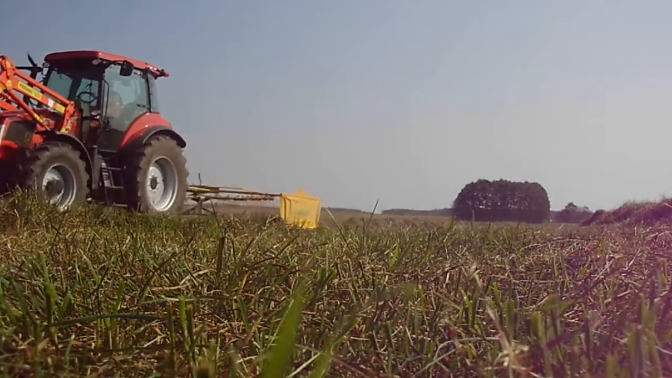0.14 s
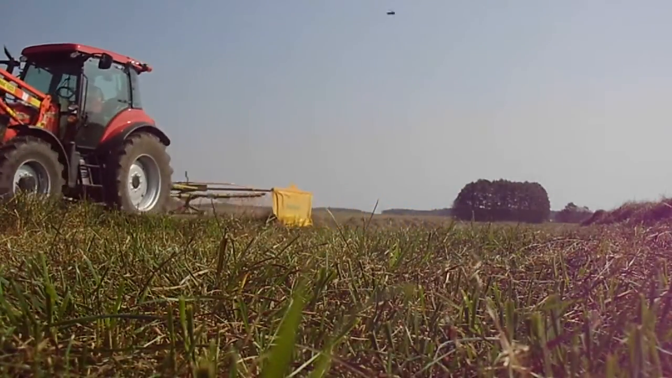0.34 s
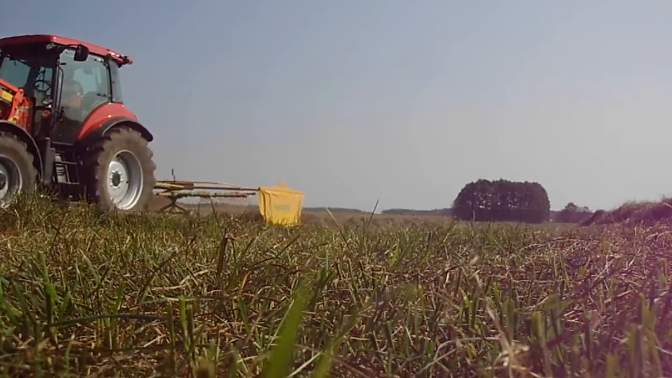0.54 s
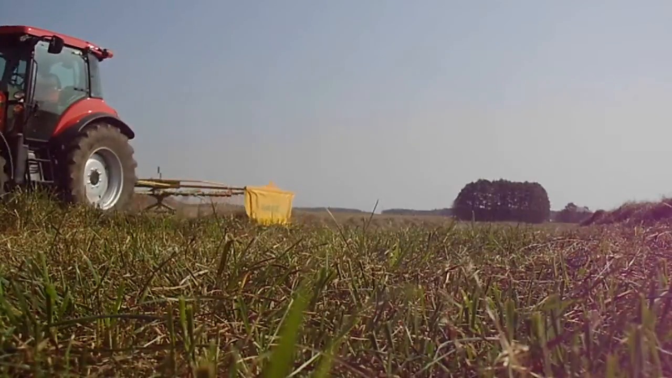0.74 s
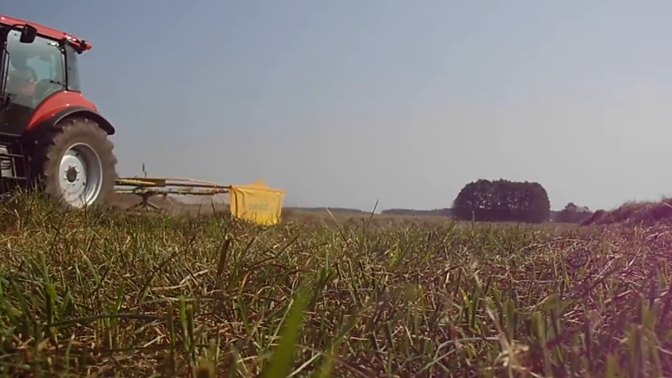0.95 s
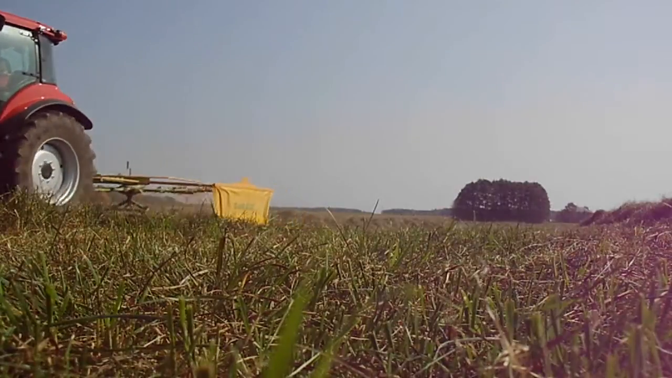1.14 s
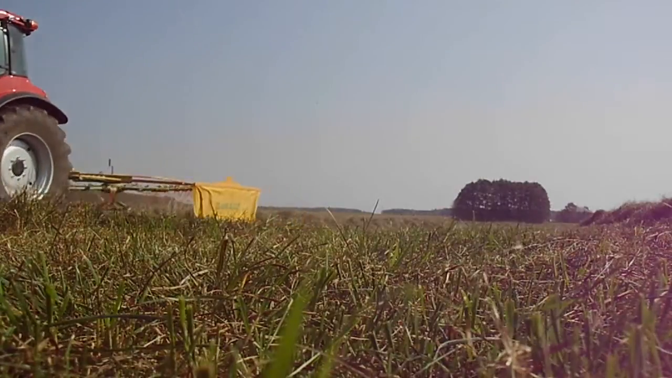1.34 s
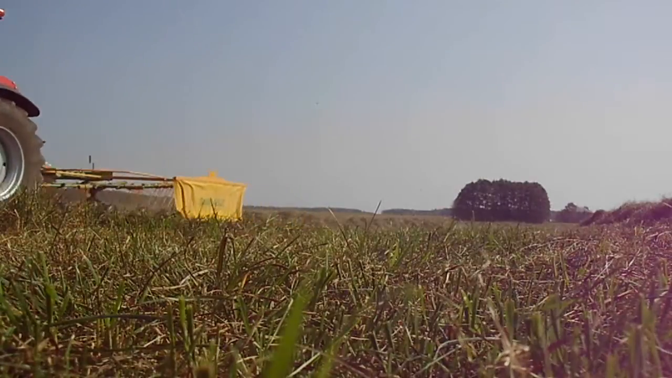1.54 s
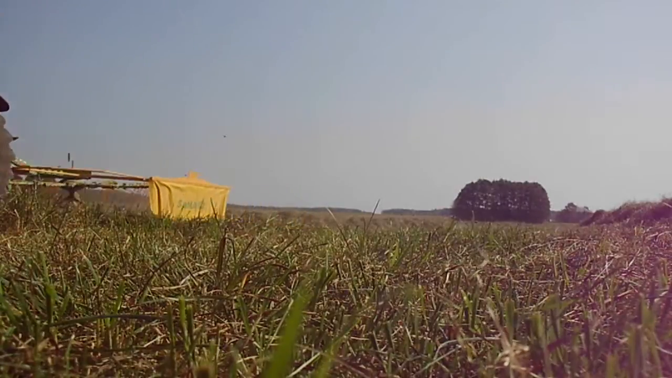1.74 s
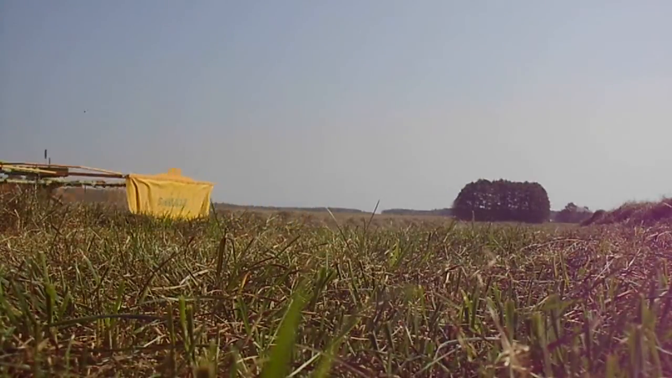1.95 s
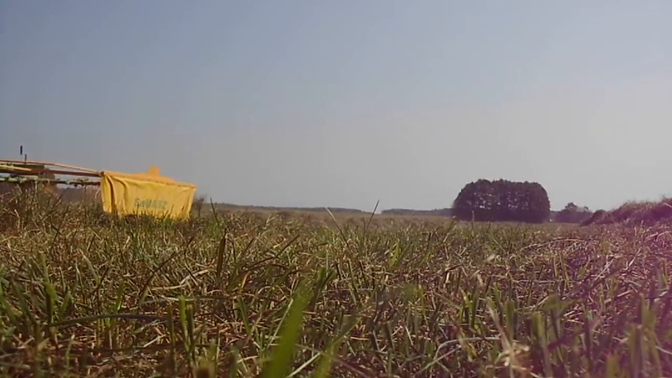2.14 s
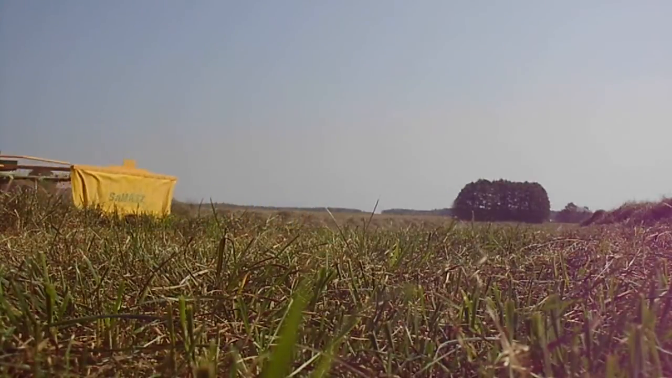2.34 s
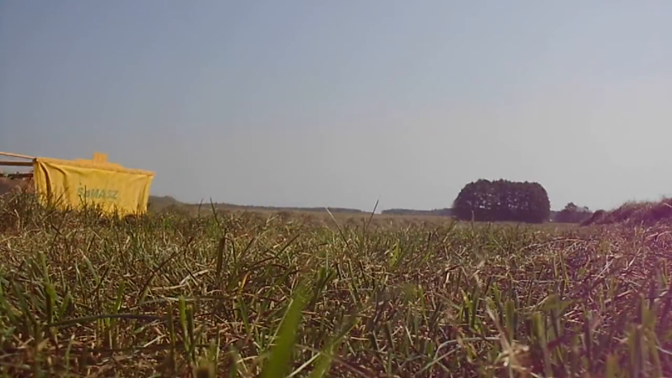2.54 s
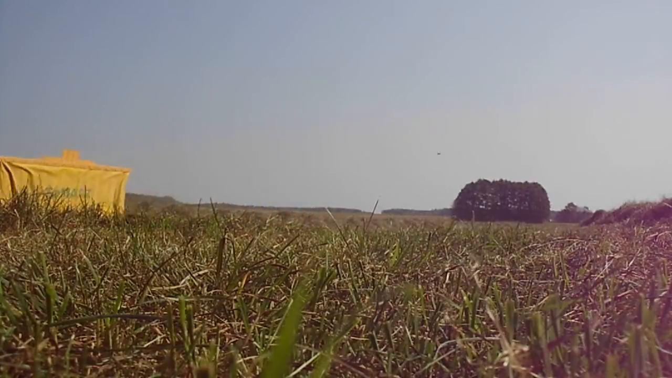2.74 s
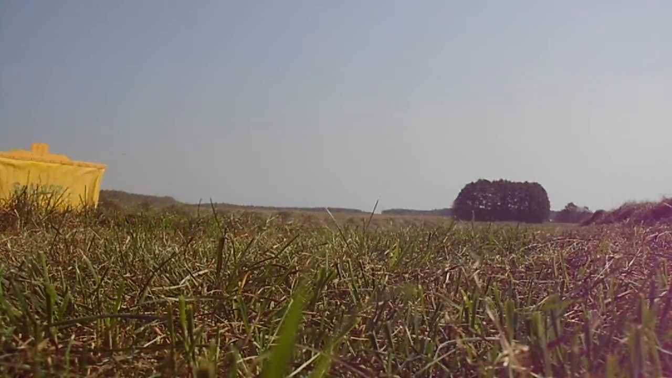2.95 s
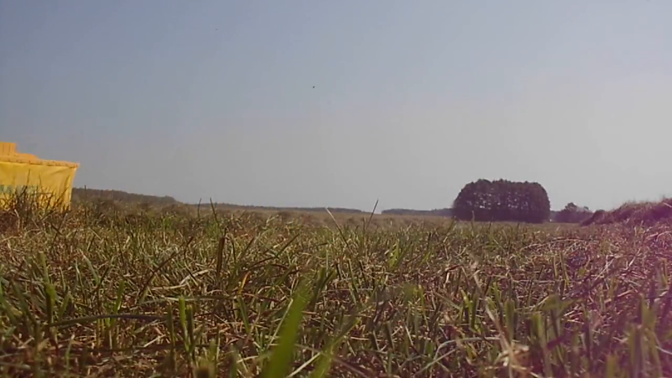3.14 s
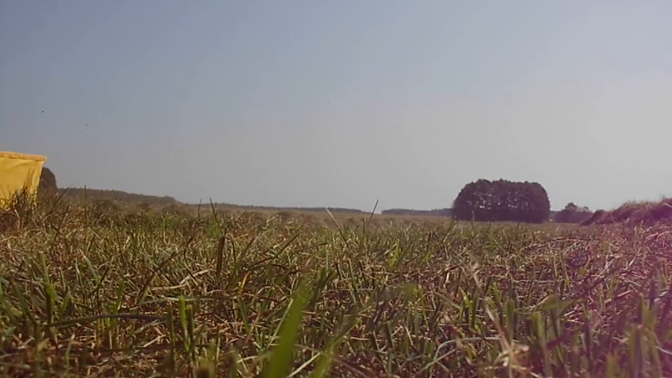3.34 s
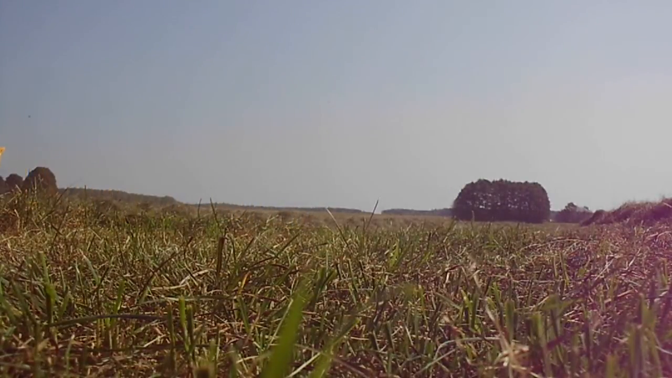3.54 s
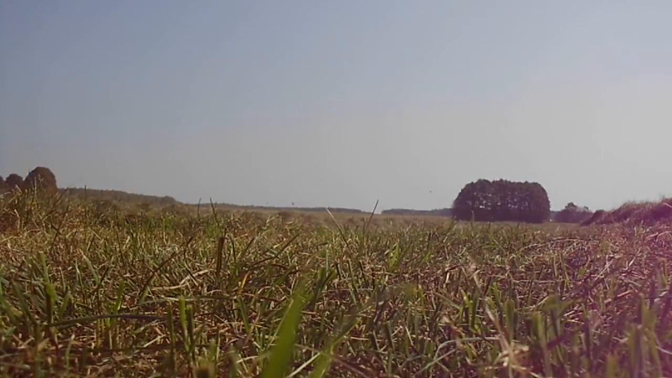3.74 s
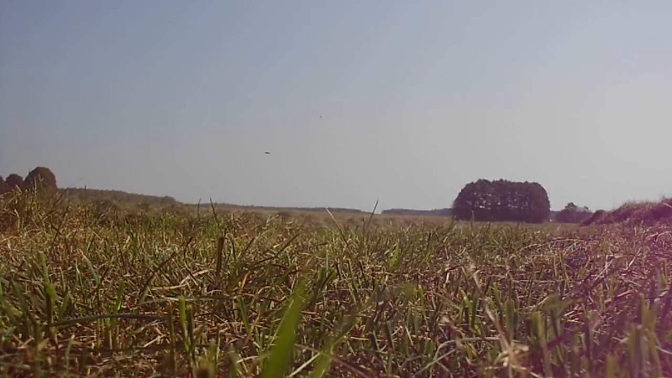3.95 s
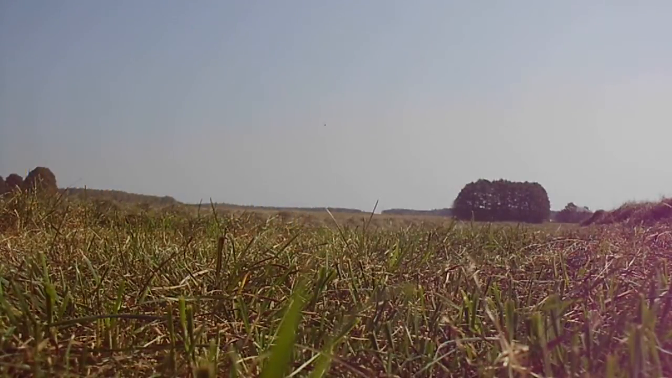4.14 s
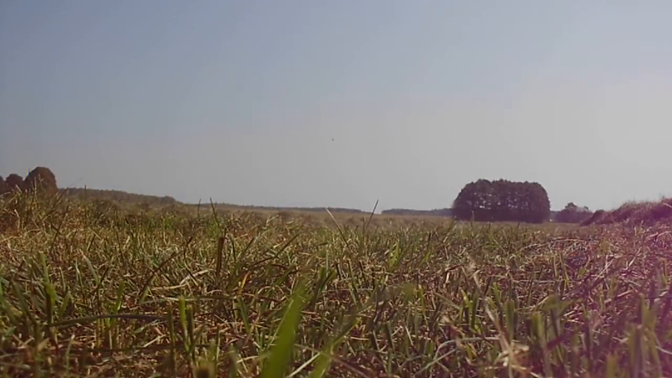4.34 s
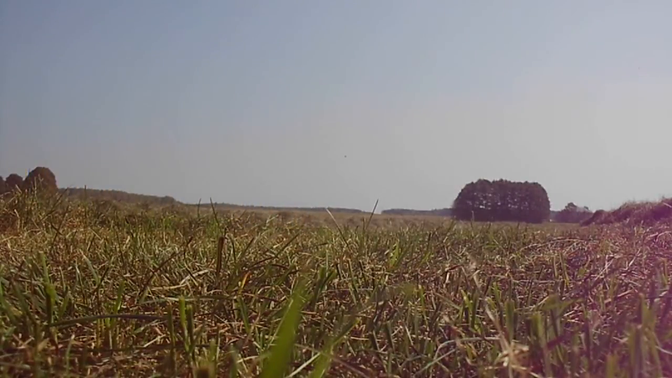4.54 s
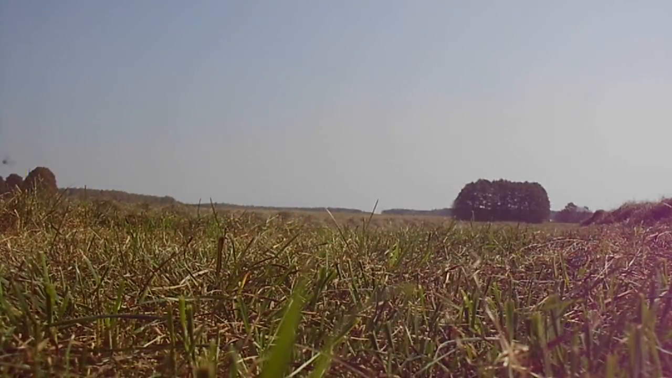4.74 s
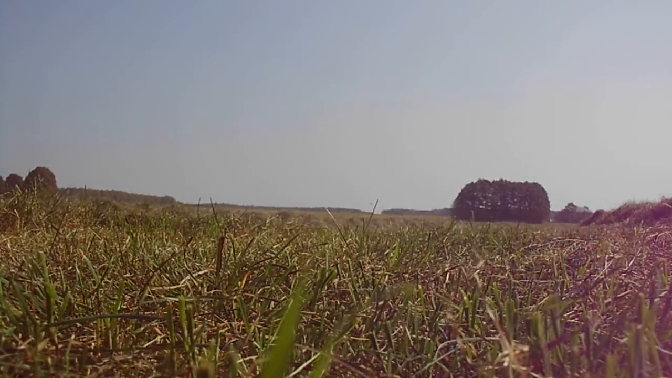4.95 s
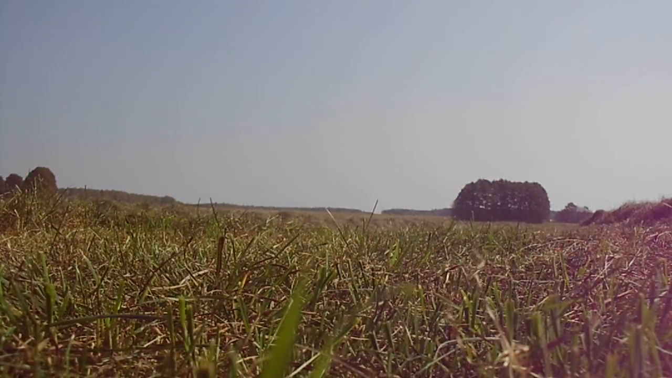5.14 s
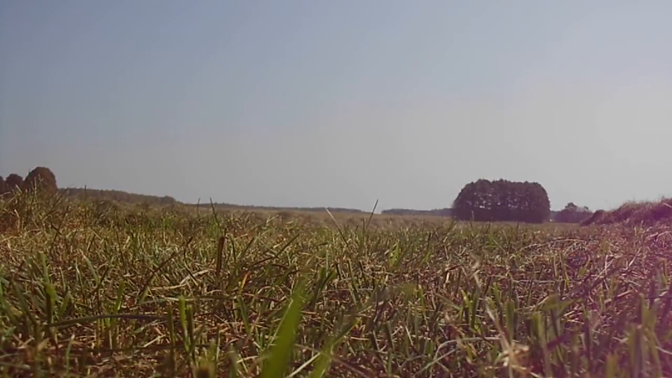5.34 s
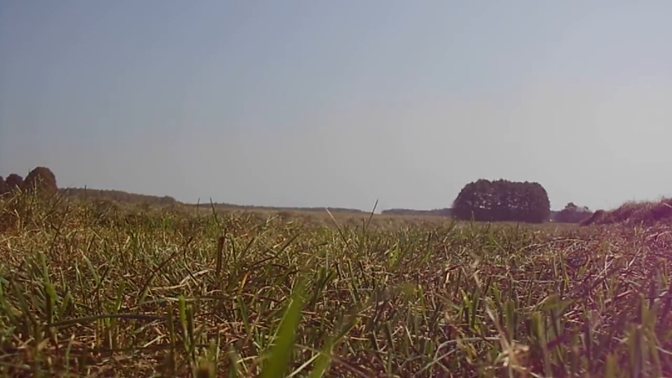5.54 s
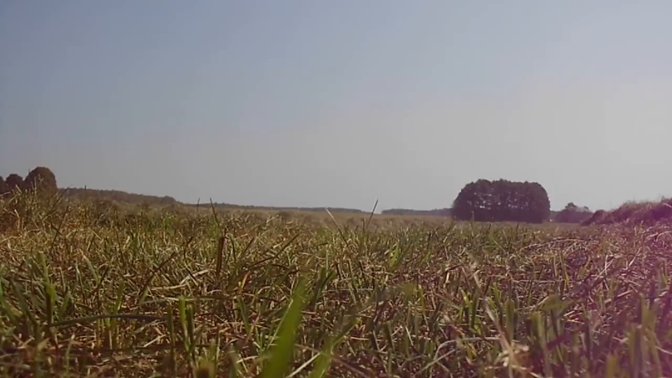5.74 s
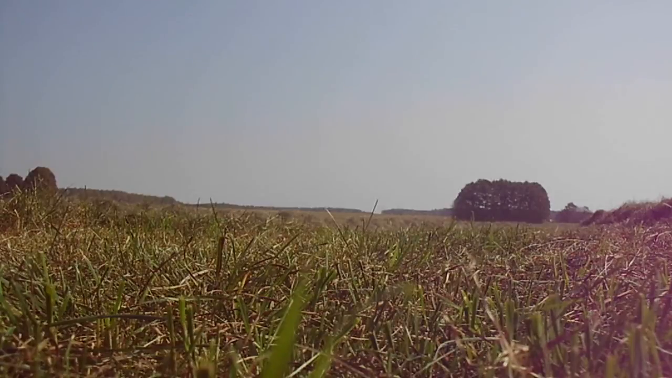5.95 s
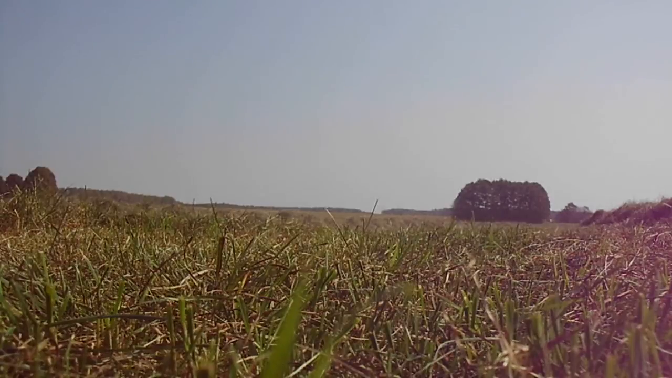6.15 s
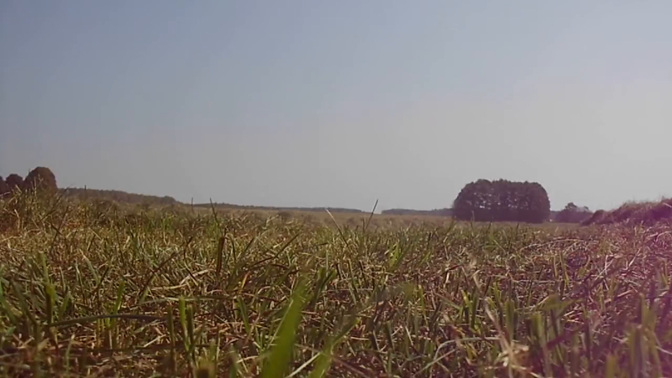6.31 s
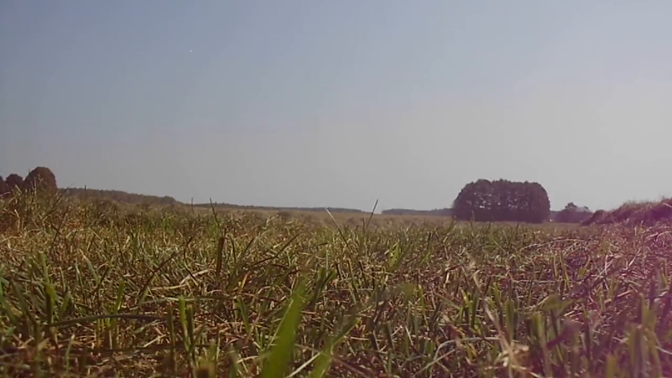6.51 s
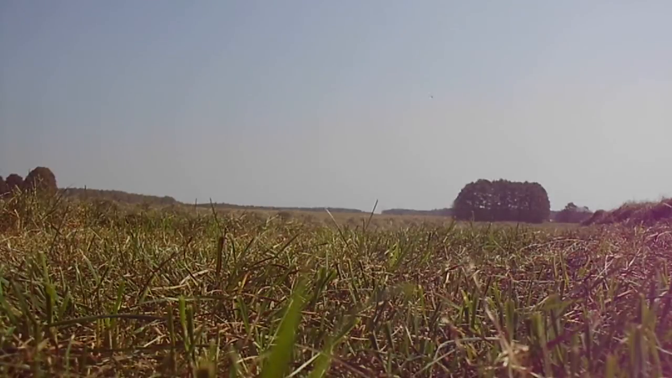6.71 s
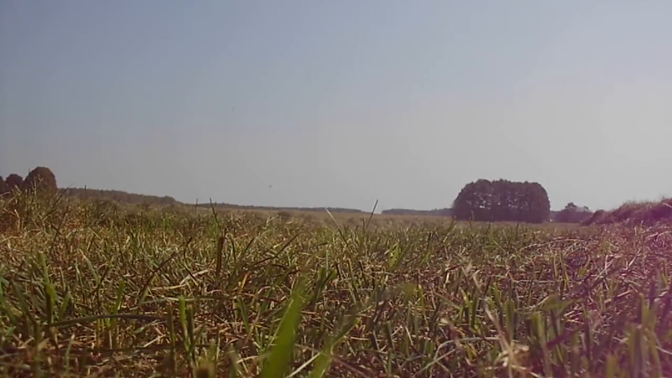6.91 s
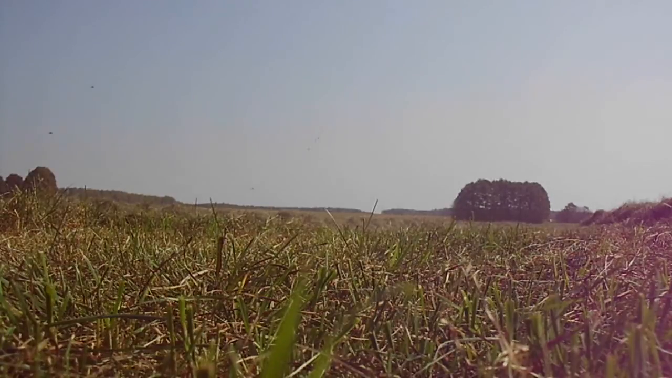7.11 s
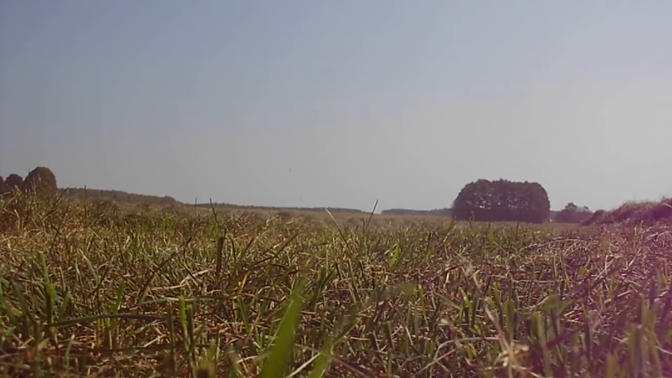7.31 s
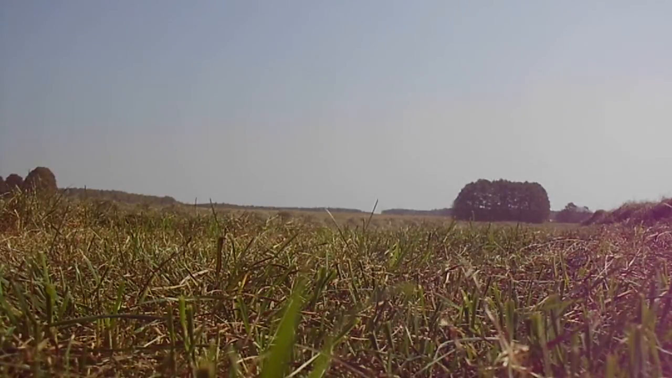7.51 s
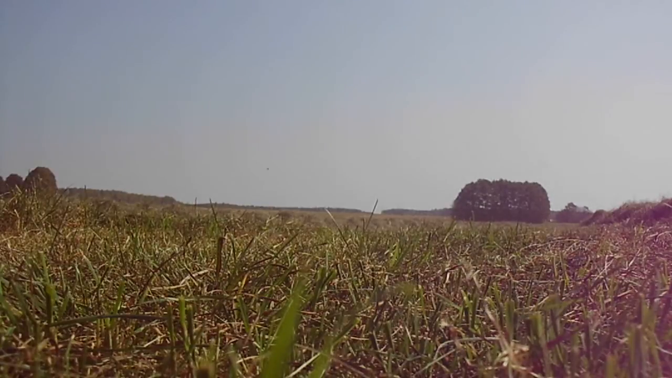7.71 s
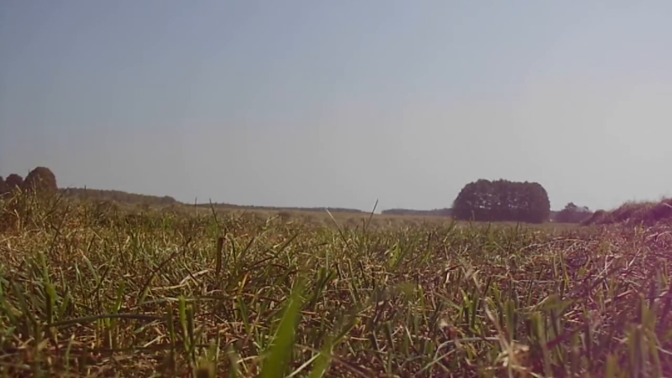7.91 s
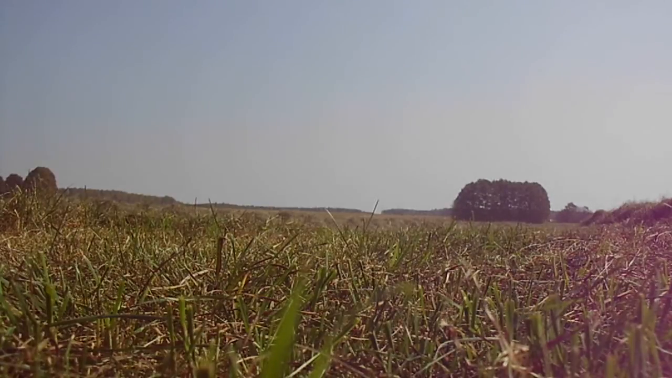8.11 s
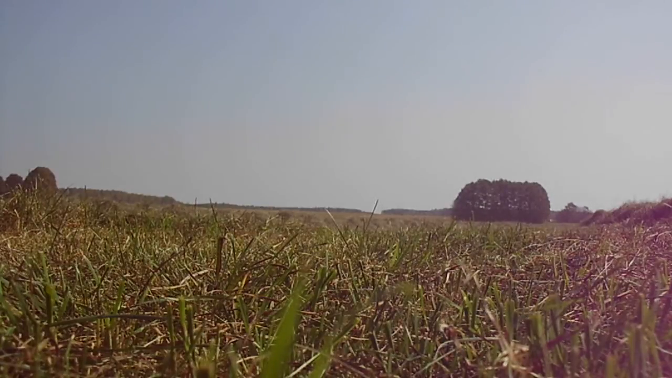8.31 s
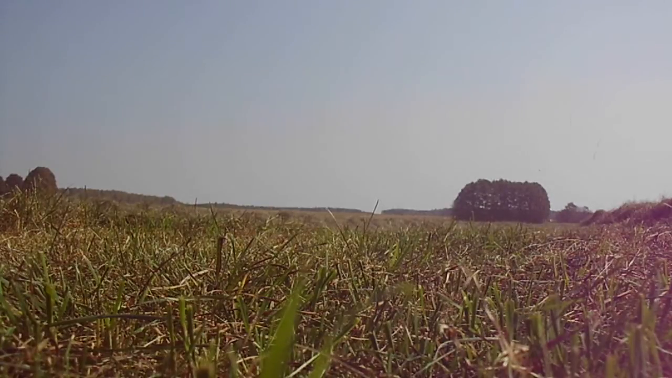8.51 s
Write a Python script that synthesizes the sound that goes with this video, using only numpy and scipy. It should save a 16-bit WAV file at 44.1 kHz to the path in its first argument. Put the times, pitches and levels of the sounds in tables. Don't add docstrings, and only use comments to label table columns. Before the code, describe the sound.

A steady, heavy diesel drone swells slightly as the tractor comes abreast, with rough exhaust rumble, pulsing clatter and swishing hay. Intermittent high whines come from the rake gears. As the tractor leaves, metal tines rattle and a dry joint chirps in quick bursts, before the engine gradually drops in level. Close, outdoor, low-placed small camera microphone with limited treble, flattened peaks and only a faint late echo.

```python
import sys
import numpy as np
from scipy import signal
from scipy.fft import rfft, irfft
from scipy.io import wavfile
from scipy.ndimage import uniform_filter1d

SR = 44100
rng = np.random.default_rng(int(sys.argv[2]) if len(sys.argv) > 2 else 0)


def pcm_store(signal):
    levels = np.round(np.clip(np.atleast_2d(signal), -1, 1) * 32767)
    wavfile.write(sys.argv[1], SR, levels.astype(np.int16).T)


def gain_from_db(level_db):
    decades = np.asarray(level_db, float) / 20
    return 10 ** decades


N = 382347
T = np.arange(N) / SR
ABREAST_S = 3.0

# closest_db [dB], share of the distance loss [ratio], turning [dB/s]
PARTS = [
    (-14.5, 0.48, 0.14),
    (-15, 1.07, 0.1),
    (-31, 0.89, -0.21),
    (-25.5, 1.125, -0.33),
    (-23.5, 1.01, -1.54),
]


def level(x, db):
    return x * gain_from_db(db) / np.sqrt(np.mean(x ** 2))


def columns(table):
    s, *rest = np.transpose(table)
    return [np.interp(T, s, c) for c in rest]


def walk(rate):
    hold = int(SR / rate)
    steps = np.repeat(rng.standard_normal(N // hold + 1), hold)
    return 1.3 * uniform_filter1d(uniform_filter1d(steps, hold), hold)[:N]


def tone(hz, db, wobble):
    phase = 2 * np.pi * np.cumsum(hz) / SR + wobble * walk(11) + 2 * np.pi * rng.random()
    return np.sqrt(2) * gain_from_db(db + 3.0 * wobble * walk(15)) * np.sin(phase)


def band(x, hz, width_hz):
    edges = np.clip([hz - width_hz / 2, hz + width_hz / 2], [300, 400], [7000, 9000])
    return signal.sosfilt(signal.butter(2, edges, "band", fs=SR, output="sos"), x)


def heard(db, share, turning):
    # time_s [s], gain_db [dB]
    nearness = [(0, -3.5), (.8, -1.87), (1.7, 0.5), (3.0, -0.05), (3.9, .5), (4.5, -.3), (5.2, -3),
                (6.4, -7), (7.6, -11), (8.67, -14.5)]
    return db + share * columns(nearness)[0] + turning * (T - ABREAST_S)


def swells(rows):
    return sum(db * np.exp(-((T - s) / half) ** 2) for s, half, db in rows)


def speed():
    governor = [(0, 53.4), (.5, 52.6), (.8, 52.95), (1.2, 52.1), (1.6, 53.4), (1.83, 52.4), (2.2, 53.75),
                (2.52, 52.2), (2.72, 52.9), (3.02, 52), (3.33, 52.5), (3.7, 52.2), (4, 52.9), (4.25, 52.3),
                (4.6, 53.4), (4.95, 51.9), (5.65, 52.8), (8.67, 52.25)]
    flywheel_s = .14
    return uniform_filter1d(columns(governor)[0], size=int(flywheel_s * SR))


def firing():
    multiples = (1, 2, 3, 5, 7.88)
    # closest_db [dB], share of the distance loss [ratio], turning [dB/s], wander_db [dB]
    orders = [
        (-22, 0.5, -0.05, -0.3),
        (-28, .35, -0.2, 2),
        (-22.5, .9, 0.52, 0.8),
        (-37, 1.5, -1, 2),
        (-27.5, 0.71, -2.5, -1),
    ]
    side_tones = ((1.75, 2.25, 2.5, 3.2, 4, 4.75, 5.5, 7.1, 7.5, 8.64, 12.24, 12.42, 15.76, 17.48, 18.64),
                  (-24, -24, -21, -23, -17, -21, -22, -19, -21, -22, -20, -22, -21, -24, -25))
    # centre_s [s], half_length_s [s], gain_db [dB]
    booms = [
        (.3, 0.74, -8.5),
        (2.8, 0.37, 7.5),
        (4.9, 0.55, 5),
        (8.6, .3, -11.5),
    ]
    # centre_s [s], half_length_s [s], gain_db [dB]
    bonnet_swells = [(.5, .15, 9), (1.2, .25, 13), (3.3, .4, 7)]
    # centre_s [s], half_length_s [s], gain_db [dB]
    pump_swells = [(.2, .7, 4), (1.58, .2, 5.5), (2.2, .12, 3), (3.05, .35, 7.5), (3.75, .15, -5),
                   (4.5, .35, 10), (5.7, .6, 7)]

    hz = speed()
    tones_db = [heard(*row) + wander * walk(2.95) for *row, wander in orders]
    tones_db[2] = tones_db[2] + swells(booms)
    tones_db[3] = tones_db[3] + swells(bonnet_swells)
    tones_db[4] = tones_db[4] + swells(pump_swells)
    casing_db = heard(*PARTS[1])
    lift_db = (0, 1, 1.5, 2.5, 2)
    wobble = (.02, .12, .2, .15, .15)

    tones = np.zeros(N)
    for multiple, db, lift, unsteady in zip(multiples, tones_db, lift_db, wobble):
        tones += tone(multiple * hz, db + lift, unsteady)
    for multiple, db in zip(*side_tones):
        tones += tone(multiple * hz, casing_db + db + 2.5, .25)

    boom_db = uniform_filter1d(np.maximum(tones_db[2], -40), size=SR // 2)
    tones += tone(2.66 * hz, boom_db - 5.5, 0.75)
    tones += tone(2.77 * hz, boom_db - 8, 0.83)
    return tones, np.cumsum(hz) / SR


def roar(turns):
    # pitch_hz [Hz], density_db [dB per Hz]
    machine_colour = [(20, -14.5), (45, -19), (80, -8.5), (145, -3), (200, -4), (400, -4.5), (500, -6),
                      (950, -12.5), (1350, -24), (2600, -23), (2800, -18), (3850, -20), (5050, -10.5),
                      (5500, -13.5)]
    edges_hz = (20, 340, 1250, 2600, 4300, 7000)
    trim_db = (-1.24, -0.7, 0.5, 0.97, 2.5)
    pulsing = (0.071, 0.037, 0.067, 0.049, 0.36)
    flicker_db = (.4, .5, .8, .7, .8)

    f = np.fft.rfftfreq(N, 1 / SR) + 1
    colour_hz, colour_db = np.transpose(machine_colour)
    colour = gain_from_db(np.interp(np.log(f), np.log(colour_hz), colour_db))

    strength = gain_from_db(4.2 * rng.standard_normal(600))[turns.astype(int)]
    knock = np.exp(-(turns % 1) / 0.5) * strength
    knock = uniform_filter1d(knock, size=60) / np.mean(knock)

    gust = walk(3.4)
    out = np.zeros(N)
    for k, row in enumerate(PARTS):
        share = 1 / np.sqrt((1 + (edges_hz[k] / f) ** 16) * (1 + (f / edges_hz[k + 1]) ** 16))
        part = irfft(rfft(rng.standard_normal(N)) * colour * share, N)
        part = part * (1 - pulsing[k] + pulsing[k] * knock)
        flicker = flicker_db[k] * (walk(14) + .3 * gust)
        out += level(part, 0) * gain_from_db(heard(*row) + trim_db[k] + flicker)
    return out


def tines():
    at, size = rng.random((160, 2)).T
    kicks = np.zeros(N)
    kicks[(at * (N - 1)).astype(int)] = np.minimum(-np.log(size), 2.5)
    decay_s = .004
    envelope = signal.lfilter([1], [1, -np.exp(-1 / (decay_s * SR))], kicks)
    bursts = envelope * rng.standard_normal(N)
    return level(band(bursts, 4600, 2400), -12) * gain_from_db(heard(*PARTS[2]))


def whines():
    # centre_s [s], half_length_s [s], gain_db [dB]
    gear_swells = [(.7, 0.26, 5), (1.85, 0.11, 9), (2.18, .13, 13), (2.52, .06, 8), (2.8, .12, 11),
                   (3.33, 0.069, 13), (3.72, .12, 8.2), (4.2, 0.065, 7.3), (4.5, .12, 7.3), (6.1, .1, 9.1),
                   (8.0, .08, 13), (8.55, .1, 15)]
    gearbox_swells = [(.2, .2, 12), (.75, .12, 10), (1.55, .2, 12), (2.2, .2, 10), (2.95, .1, 10),
                      (3.7, .12, 10), (4.05, .06, 10)]
    shaft_swells = [(.6, .3, 4), (3.35, .25, 13), (4.05, .3, 17)]
    shaft_ratio, gear_ratio, gearbox_ratio = 5.7, 54, 67.5

    hz = speed()
    gear_hz = gear_ratio * hz
    gear_db = heard(-44, 1.35, -.3) + swells(gear_swells)
    unsteady = .35
    mesh = tone(gear_hz, gear_db + 2.5, unsteady)
    mesh += tone(gear_hz / 2, gear_db - 10, unsteady)
    mesh += tone(gear_hz * 3 / 2, gear_db - 6, unsteady)

    broken = gain_from_db(2.5 * walk(25) - 2)
    gearbox_db = heard(-47.5, 1.7, -.8) + swells(gearbox_swells)
    gearbox = broken * tone(gearbox_ratio * hz, gearbox_db, unsteady)

    patchy = gain_from_db(2.5 * walk(40) - 1)
    shaft_db = heard(-40, .3, .1) + swells(shaft_swells)
    return patchy * mesh + gearbox + gain_from_db(2.5) * tone(shaft_ratio * hz, shaft_db, .2)


def clanks():
    # start_s [s], peak_db [dB], centre_hz [Hz]
    ticks = [(2.132, -4, 5200), (3.983, -3.5, 5250), (5.095, -14, 5370), (5.236, -8, 4930),
             (5.438, -4.5, 4710), (6.08, -3, 5000), (6.123, -13, 4900), (7.617, -18.5, 5060),
             (7.702, -18.5, 5200), (7.735, -15, 5000), (8.019, -24, 5200), (8.415, -23, 4500)]
    # start_s [s], peak_db [dB], decay_s [s]
    jolts = [(3.755, -13, .28), (4.387, -12, 0.12), (6.062, -10, 0.19), (6.171, -18.5, 0.17),
             (7.915, -22, .04), (8.258, -25, 0.091)]
    # start_s [s], peak_db [dB], pitch_hz [Hz], decay_s [s]
    rings = [(5.44, -6.5, 3300, 0.045), (6.065, -12.5, 2820, .14), (6.069, -12, 4660, .25),
             (6.092, -12, 3200, .1), (6.098, -15, 4810, .16), (6.165, -22, 4280, 0.099),
             (8.32, -28, 4850, 0.086), (8.628, -28, 5450, .08)]
    tick_width_hz, tick_decay_s = 1200, .05
    jolt_hz, jolt_width_hz, ring_width_hz = 2700, 4000, 300

    length = 8192
    out, t = np.zeros(N + length), T[:length]
    chatter = np.resize(gain_from_db(2.2 * walk(180)), N + length)
    blows = [(s, db, hz, tick_width_hz, tick_decay_s) for s, db, hz in ticks]
    blows += [(s, db, jolt_hz, jolt_width_hz, decay) for s, db, decay in jolts]
    blows += [(s, db, hz, ring_width_hz, decay) for s, db, hz, decay in rings]

    rattle = rng.standard_normal((len(blows), length))
    for (s, db, hz, width_hz, decay), noise in zip(blows, rattle):
        shake = (1 - np.exp(-t / .001)) * 10 ** (-3 * t / max(decay, .01))
        i = int(s * SR)
        out[i:i + length] += level(band(noise, hz, width_hz), db - 7) * shake * chatter[i:i + length]
    return out[:N]


def squeaks():
    bursts = [(4.852, .022, 1640, -21, 4), (4.871, .052, 1700, -9.5, 7), (4.893, .018, 1725, -9, 26),
              (4.908, 0.027, 1720, -17, 14), (4.941, 0.024, 1720, -14, 12), (4.935, 0.046, 1590, -21, 12),
              (4.984, 0.053, 1640, -19.5, 12.5), (5.009, .015, 1700, -22, -12),
              (5.102, 0.052, 1640, -19, -13), (5.102, 0.022, 1598, -18.5, 21),
              (5.252, 0.033, 1810, -31.5, -4), (5.391, 0.048, 1580, -25, -18), (5.424, .03, 1583, -24, 18),
              (5.45, .04, 1494, -30, -12), (6.822, 0.014, 1586, -30, -19.5),
              (7.369, .007, 1670, -26, -21.5), (8.514, 0.013, 1615, -27.5, -14)]
    slip_db, slip_loud_hz, slip_db_per_hz = -15.5, 1700, .12

    out = np.zeros(N)
    unsteady = walk(300)
    grip = gain_from_db(1.0 * walk(250))
    grit = 1 + .4 * walk(700)
    for s, length, hz, top_db, tilt in bursts:
        first_db = top_db + slip_db - slip_db_per_hz * max(slip_loud_hz - hz, 0)
        dbs = (first_db, top_db - max(tilt, 0), top_db + min(tilt, 0))
        i = np.arange(int(s * SR), min(int((s + length) * SR), N))
        u = np.abs(T[i] - s) / length
        slip = hz * (1 + .008 * (u - .5) + .004 * unsteady[i])
        phase = 2 * np.pi * np.cumsum(slip) / SR
        swell = np.clip(np.sin(np.pi * u ** 0.56), 0, 1) ** 0.24
        voice = sum(gain_from_db(db) * np.sin((k + 1) * phase) for k, db in enumerate(dbs))
        out[i] += swell * grip[i] * grit[i] * voice
    return out


def scene():
    tones, turns = firing()
    rake = squeaks() + clanks()
    echo = np.roll(rake, int(0.058 * SR)) * gain_from_db(-20.5)
    return (tones + roar(turns) + whines() + rake + echo + tines())[None]


def roll_off(x):
    return signal.sosfilt(signal.butter(12, 15830, fs=SR, output="sos"), x)


def record(dry):
    top_hz, clip, offset = 5500, .71, .0108
    cut = signal.sosfilt(signal.ellip(8, .3, 60, top_hz, fs=SR, output="sos"), dry)
    sparse = np.zeros_like(cut)
    sparse[:, ::4] = 4 * np.clip(cut[:, ::4] + offset, -clip, clip)
    stretch = signal.firwin(193, 5510, window=("kaiser", 6.2), fs=SR)
    smooth = signal.fftconvolve(sparse, stretch[None], "same")
    ceiling = 0.99 * clip
    flat = np.clip(smooth, -ceiling, ceiling)

    smear_s, smear_db = .045, -12
    above = signal.butter(5, (5900, 8200), "band", fs=SR, output="sos")
    power = signal.sosfilt(above, flat - smooth) ** 2
    for _ in range(2):
        power = uniform_filter1d(power, size=int(smear_s * SR / 2))
    hiss = signal.sosfilt(above, rng.standard_normal(N))
    haze = level(hiss, smear_db) * np.sqrt(np.abs(power))
    return roll_off(flat + haze)


dry = scene()
out = record(dry)
pcm_store(out)
```